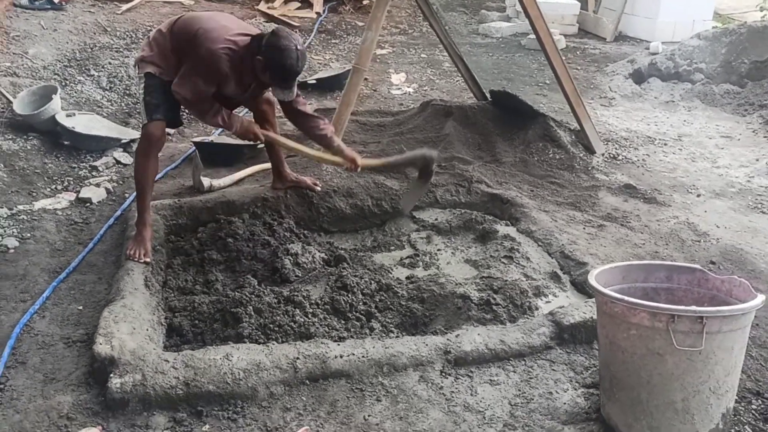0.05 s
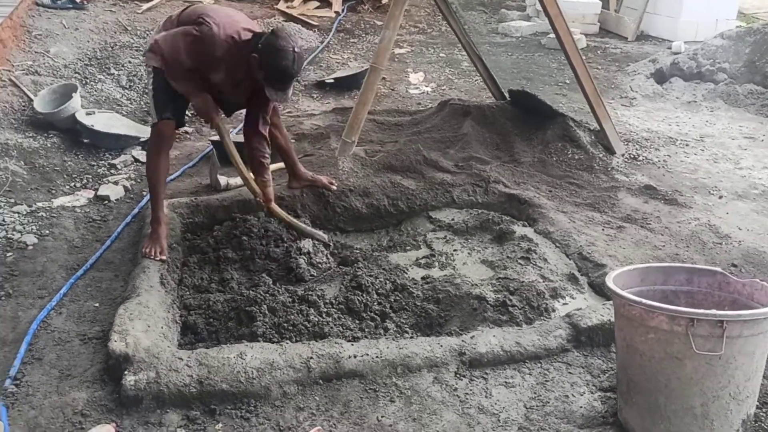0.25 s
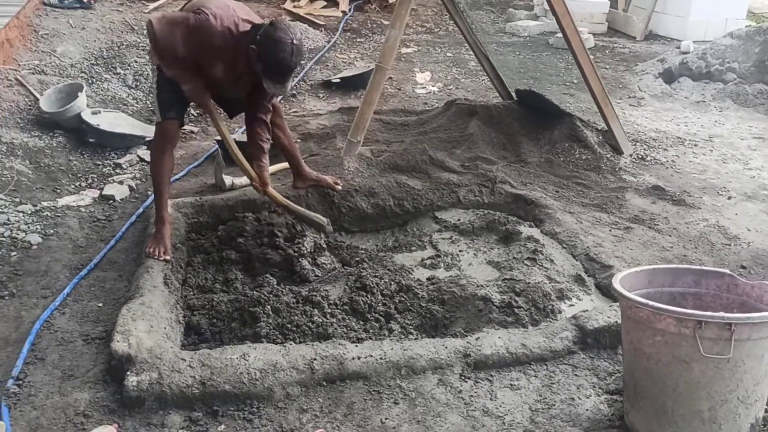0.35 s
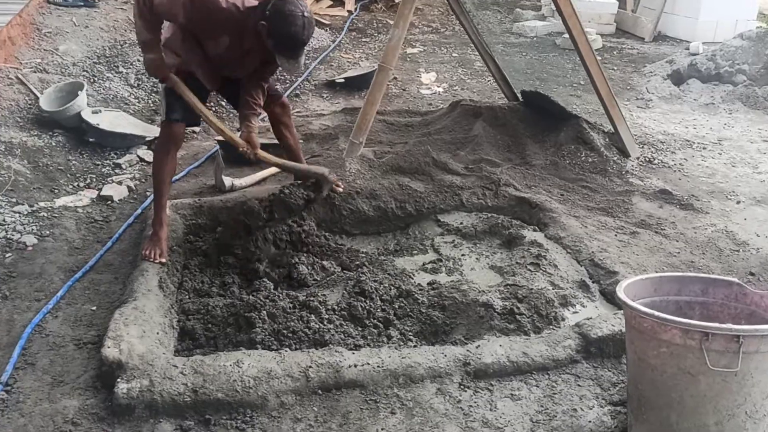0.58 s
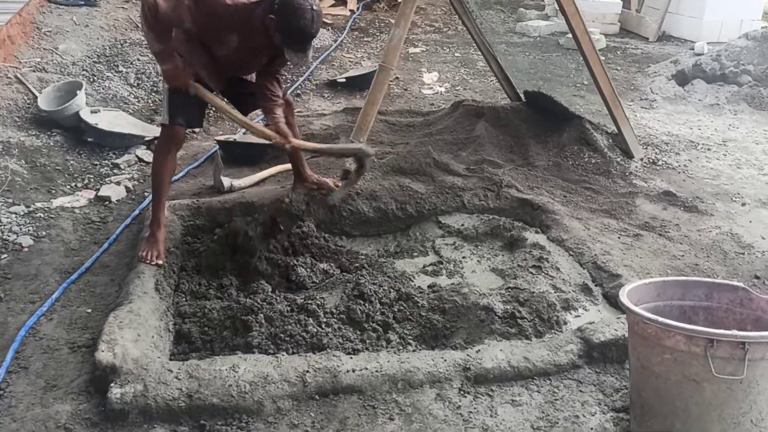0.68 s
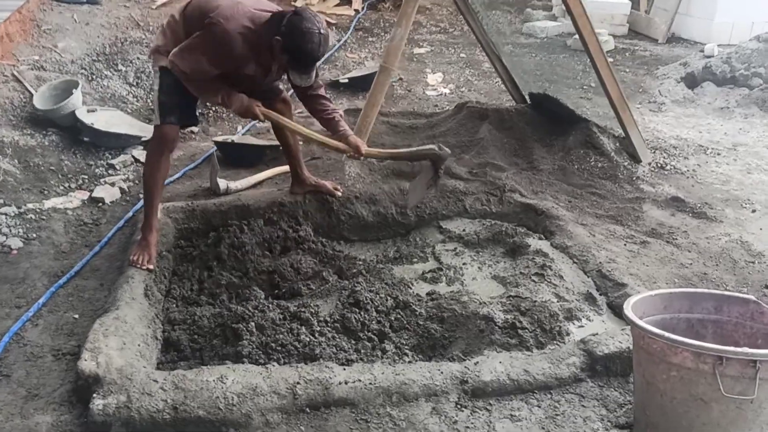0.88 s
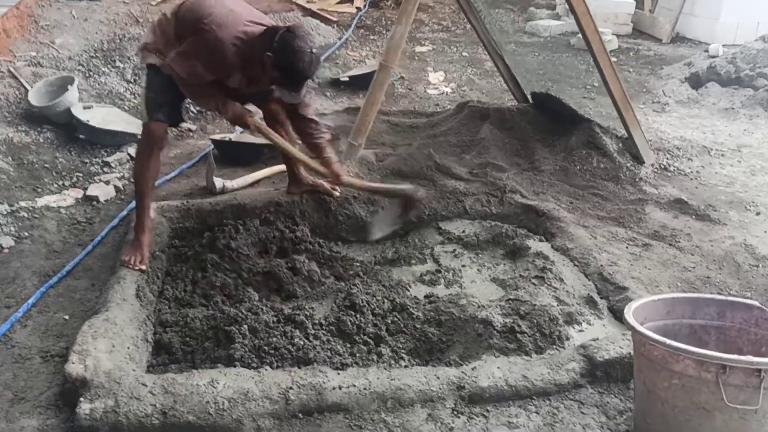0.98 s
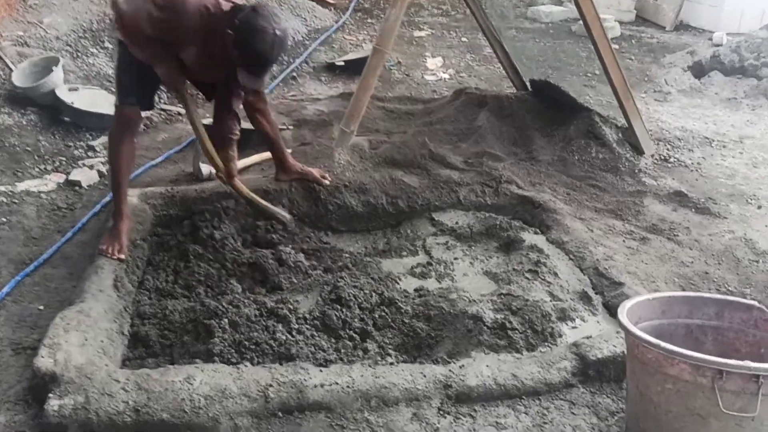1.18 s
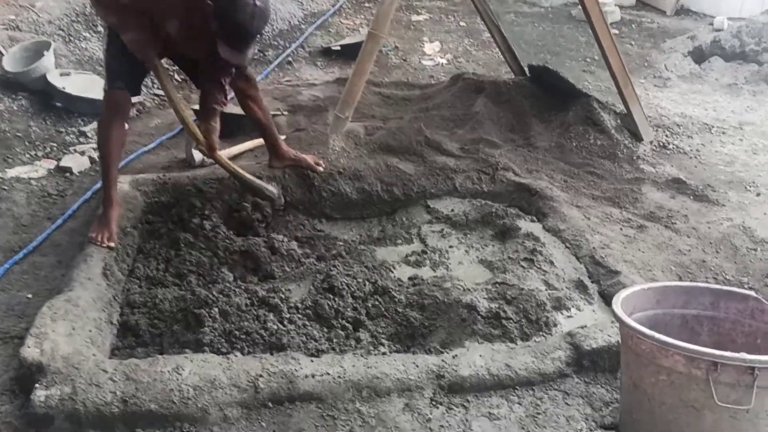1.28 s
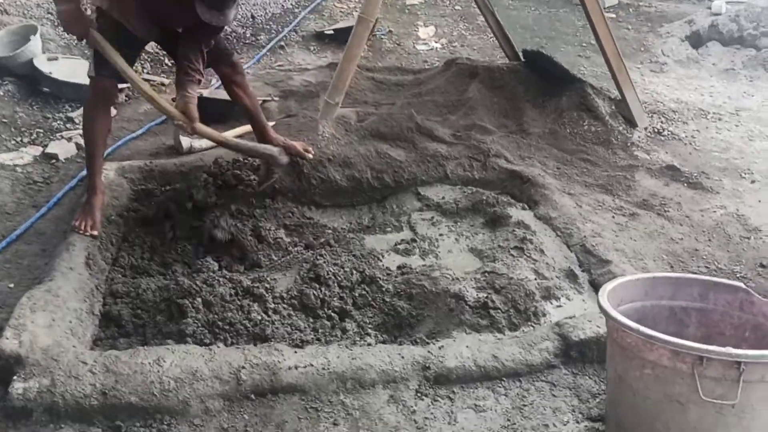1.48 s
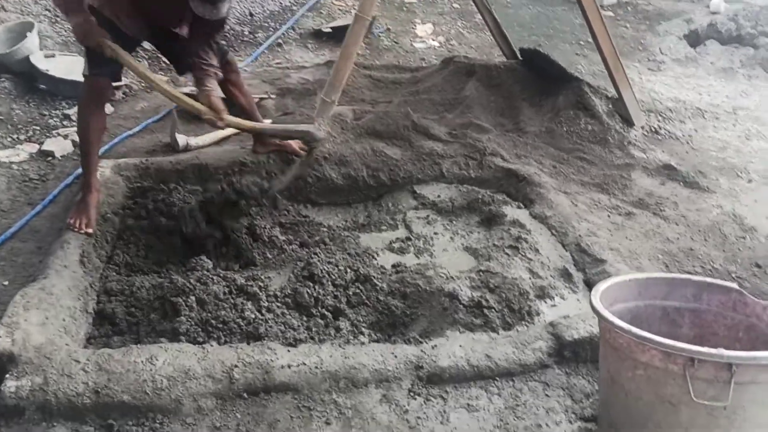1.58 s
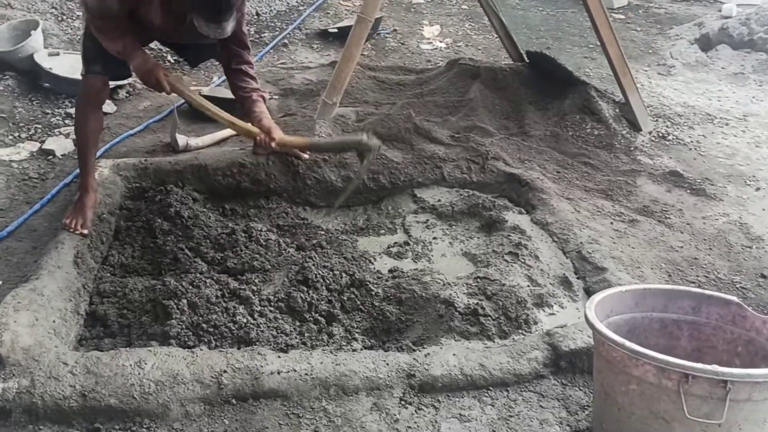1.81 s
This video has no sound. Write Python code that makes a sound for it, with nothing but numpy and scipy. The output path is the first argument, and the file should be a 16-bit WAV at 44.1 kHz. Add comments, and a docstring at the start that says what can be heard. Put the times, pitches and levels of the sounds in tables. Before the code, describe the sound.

Close and dry outdoors on a phone microphone: two crunchy hoe chops about a second apart in gravelly mortar, separated by quiet scraping, dull lump thuds and small stone pings, ending in light pebble ticks.

```python
"""Outdoors, near a phone camera, a struck metal thing is still ringing while a hoe drags in gritty cement mix.
The hoe chops in: random grains crunch through blade resonances, then more dragging, and lumps tumble and thud
as filtered grains and damped tones. A second chop adds a knock on the hard bed, four short modes at once.
Lumps roll on, the drag resumes and pebbles tick more often, each a damped ring with a noise crack.
Stones ping at random throughout, over a murmur of filtered noise. Two microphone ports colour the grit differently.
"""
import sys
import numpy as np
from scipy import signal
from scipy.fft import rfft, irfft, next_fast_len
from scipy.io import wavfile
from scipy.ndimage import uniform_filter1d, map_coordinates

SR = 44100
rng = np.random.default_rng(int(sys.argv[2]) if len(sys.argv) > 2 else 0)


def master(y):
    """Save y as 16-bit WAV."""
    cut = np.clip(np.atleast_2d(y).T, -1, 1)
    pcm = np.round(cut * 32767)  # scale
    wavfile.write(sys.argv[1], SR, pcm.astype(np.int16))


N = 81585  # length in samples

# Blade biting in, one list per chop. Each row: time in seconds, grit hiss level in dB, then in dB over that hiss:
# upper hiss, crunch, low crunch and top sizzle.
CHOP_LEVELS = [[(.205, -60, 2, 1, -9, -17.5), (.2075, -40, -4, -10, -0.5, -25),
               (.2115, -34, 3, -12, -20, -26),
               (.213, -23, -2, -19, -21, -27)] + [(0.218, -25.5, 2, -9.5, -7.5, -20),
               (0.232, -16.5, -11.5, -6.5, -19, -32), (0.25, -28.5, -6, -2.5, -11, -18),
               (0.324, -48.5, -1, -0.5, -4.5, -17.5), (0.36, -47, -6, -6, -16.5, -21)],
               [(1.075, -61.5, 0, -5.5, -9, -18), (1.0775, -46, 0.5, -8, -19, -14),
               (1.0805, -36.5, 1.5, -5, -22, -9), (1.083, -32.5, 0, -9, -22, -9),
               (1.0855, -22, -10, -16, -21.5, -10.5)] + [(1.09, -21.5, -2.5, -9, -19, -10.5),
               (1.104, -19, -8.5, -14.5, -23, -19), (1.128, -30, 0, -1.5, -1.5, -14.5),
               (1.15, -33, -10.5, -4.5, -6, -26), (1.196, -45, -4, -2, -3, -23),
               (1.27, -51, -0.5, -5, -9, -18.5)]]
# Blade dragging and mix trickling. Each row: the same columns and units as for the chops.
DRAG_LEVELS = [
    [(.012, -49.5, -5.5, -3.5, -10, -16.5), (.1, -56.5, -1.5, 2.5, -3.5, -14.5),
     (.132, -58.5, -3, 6.5, 5.5, -13), (.137, -41.5, -2, -5, -8.5, -26), (.146, -53, -5, -4, -10, -19),
     (.152, -52.5, -0.5, -1.5, -4.5, -11.5), (.198, -62, -1.5, 3.5, 4.5, -23)],
    [(0.365, -49.5, -4.5, -3, -5, -23), (0.461, -51, -4, -6, -8.5, -20), (0.503, -54.5, -6, -2.5, -5, -17),
     (0.519, -57, -3.5, 0.5, 2, -14), (0.545, -51.5, -3, -4.5, -6, -19),
     (0.617, -45.5, -5.5, -5.5, -10, -16.5), (0.645, -46, -2.5, -3.5, -8, -14),
     (0.66, -47, -2.5, -14, -8, -14)],
    [(0.672, -49.5, -5, -6, -7.5, -18), (0.718, -59, -1, -0.5, -1, -9), (0.77, -54.5, -1, -1.5, -8, -14.5),
     (0.778, -51, -13, -12, -9, -17.5), (0.83, -49, 1, -6, -13, -15), (0.908, -45.5, -10, -9.5, -14, -20),
     (0.924, -53, -5.5, -9.5, -9, -12), (1.016, -59, -6, -0.5, -10, -18)],
    [(1.021, -47, -4, -13, -22, -16.5), (1.029, -49, -6.5, -16, -14, -16), (1.037, -57, -1, 1, -4, -2),
     (1.049, -64.5, -2, -2, -5, -22), (1.066, -57.5, -5.5, -4, -1, -17.5)],
    [(1.275, -52.5, -1, 0.5, -4, -21.5), (1.311, -46.5, -5, -15, -19, -19.5), (1.315, -50, -5, -5, -5, -13),
     (1.411, -48, -6, -8.5, -16, -15.5), (1.443, -47, -6.5, -5.5, -6, -17),
     (1.549, -41, -0.5, -7, -19.5, -19), (1.583, -44, -5, -12, -26, -17), (1.59, -47, -2, -9, -18.5, -14)],
    [(1.605, -49.5, -1, -12, -10, -14), (1.637, -51, -7.5, -11, -26, -14),
     (1.657, -51, -0.5, -6, -11.5, -12), (1.677, -47, -5, -8, -12.5, -16),
     (1.769, -47, -3.5, -6.5, -22, -13.5), (1.795, -48, -8.5, -9, -29.5, -17.5),
     (1.809, -59.5, 2.5, 0, -14, -5), (1.85, -57, -7, -6, -13, -14.5)],
]
# Bands each chop weakens or lifts, one list per chop. Each row: centre in Hz, width in Hz, gain in dB.
CHOP_BANDS = [
    [(1024, 180, -9), (1364, 450, -4.5), (5440, 670, -6)],
    [(5500, 130, 5)],
]
# Resonances of the steel blade. Each row: pitch in Hz, width in Hz, gain in dB.
BLADE_MODES = [(3120, 16, -9.5), (3887, 63, 3), (4152, 66, -4.5), (6446, 100, 4.5), (6710, 75, -2.5),
               (6790, 96, -12), (8100, 29, -18), (7400, 35, -19), (7010, 65, -9.5), (8500, 65, -6.5)]
# Spectrum of the crunch. Each row: frequency in Hz, gain in dB.
CRUNCH_SPECTRUM = [(620, -43), (1300, -7.5), (1620, -5), (1760, -3), (1930, -4), (2090, -2), (3000, -5),
                   (3900, -20), (6600, -120)]
# Spectrum of the low crunch. Each row: frequency in Hz, gain in dB.
LOW_CRUNCH_SPECTRUM = [(400, -51), (540, -8), (620, -2), (800, -3.5), (920, -8), (1050, -10.5),
                       (1400, -39.5)]
# Lumps rolling. Each row: time in seconds, rumble level in dB.
TUMBLE_LEVELS = [
    [(.01, -53.5), (.2, -63.5), (.242, -51.5), (.32, -55.5), (.484, -60.5), (.487, -52)],
    [(0.491, -39), (0.515, -41.5), (0.527, -43), (0.551, -44), (0.583, -44.5), (0.6, -45.5), (0.8, -53.5),
     (0.881, -54), (0.923, -61), (0.965, -57), (1.07, -58.5)],
    [(1.15, -39), (1.166, -40.5), (1.214, -44), (1.242, -45.5), (1.288, -50), (1.388, -55.5),
     (1.416, -51.5), (1.44, -57), (1.468, -52), (1.594, -61), (1.6, -60.5)],
]
# Resonances of the hollow mix. Each row: pitch in Hz, width in Hz, gain in dB.
LUMP_MODES = [(224, 93, -9), (326, 76, -1.5), (401, 80, -0.5), (499, 118, -4)]
# Lumps and blade landing. Each row: start in seconds, level before attack in dB, pitch in Hz, 60 dB decay in seconds.
THUD_HITS = [(0.241, -35, 199, 0.075), (.488, -26, 477, 0.033), (.488, -29, 226, .025),
             (0.5043, -26.5, 480, 0.038), (.518, -34, 300, 0.025), (0.5385, -30, 386, 0.1),
             (.5635, -32, 522, 0.037), (0.59, -34, 435, 0.055), (1.089, -26, 362, 0.049),
             (1.1197, -11, 278, 0.053), (1.1227, -8.5, 318, 0.034), (1.138, -28.5, 304, 0.071),
             (1.1452, -13, 300, 0.014), (1.159, -32, 330, 0.021), (1.178, -35, 196, 0.051),
             (1.199, -35, 393, 0.012), (1.209, -30, 353, 0.027), (1.255, -36.5, 393, 0.046),
             (1.287, -40.5, 404, 0.13), (1.305, -36, 291, 0.071), (1.355, -42, 390, 0.088),
             (1.408, -41, 338, .06)]
# Modes of the hard bed. Each row: pitch in Hz, level over the knock in dB, 60 dB decay in seconds.
BED_MODES = [(750, -18, 0.019), (878, 10, 0.015), (1050, 6, 0.013), (1490, -24, 0.023)]
# Pebbles. Each row: start in seconds, reference level in dB, pitch in Hz, 60 dB decay in cycles of that pitch.
PEBBLE_TICKS = [(.1365, -36.5, 4180, 7.2), (.168, -37.5, 1000, 4.8), (.3905, -21.5, 1430, 2.4),
                (0.654, -32, 3600, 9.8), (.84, -32.5, 3890, 4.5), (1.172, -20.5, 3600, 13.7),
                (1.305, -33.5, 3500, 22), (1.433, -37.5, 3470, 40), (1.487, -33, 3720, 12),
                (1.527, -31.5, 3350, 9.1), (1.553, -30.5, 3420, 12), (1.576, -34.5, 3710, 12),
                (1.683, -37, 3290, 50), (1.729, -35.5, 3670, 25), (1.755, -43, 1730, 47)]
# Modes of the struck metal. Each row: pitch in Hz, level over the ring setting in dB, 60 dB decay in seconds.
METAL_MODES = [(348, -1, 0.58), (770, -2, 0.37), (2020, -7.5, .5), (2290, -10, 0.49), (2560, -7, 0.3)]
# Spectrum of the far outdoor murmur. Each row: frequency in Hz, gain in dB.
AIR_SPECTRUM = [(18, -45), (30, -25.5), (43, -10.5), (119, 4), (204, -2.5), (418, -15), (949, -10.5),
                (1500, -16), (1950, -47), (3300, -120)]
# Colour of the left microphone port. Each row: frequency in Hz, gain in dB.
LEFT_PORT = [(500, -15), (1000, -15.5), (2000, -16.5), (3000, -19.5), (4200, -13), (5100, -18.5),
             (5900, -30), (6500, -5.5), (7100, -13), (7600, -5.5), (8000, -14.5), (8600, -20.5),
             (11500, -22), (15500, -18)]
# Colour of the right microphone port. Each row: frequency in Hz, gain in dB.
RIGHT_PORT = [(500, -9.5), (1000, -15.5), (2000, -10.5), (3000, -9.5), (3700, 2.5), (4300, -2.5),
              (4700, -4), (5100, -16), (5700, -13.5), (6300, -7), (7500, -6.5), (8000, -14.5), (8600, -16),
              (11500, -20.5), (14000, -18), (15800, -34.5)]
# Phase of the right port behind the left. Each row: frequency in Hz, lag in radians.
PORT_LAG = [(300, -0.5), (2500, 1.23), (4000, -0.5), (5000, 2.5), (5500, 3), (6500, 6.5), (7500, 9.5),
            (8500, 10.5), (11500, 10.5), (16000, 16.5)]
CODEC_GAP = (8550, 11550)

DRAG_TRAIL_S = .00008  # extra lag of the right port for drags, which lie further left
DRAG_BLADE_DB, CHOP_BLADE_DB = 0, 4.5  # blade ring over the bare grit
GRAVEL_PER_S, GRAVEL_T60_S = 170, 0.013
GRAVEL_HZ, GRAVEL_OCTAVES = 3796, 0.3  # middle pitch and its random spread
GRAVEL_DB, GRAVEL_SPREAD_DB = 2, 3.5  # over the hiss, plus a random extra
THUD_CUT_HZ = 94  # small lumps push no deep bass
THUD_TRAIL_S = 0.00015  # lag of the right port behind the left
KNOCK_S, KNOCK_DB = 1.1225, -21.5  # the blade meets the hard bed
CRACK_DB, CRACK_T60_S = -2.5, 0.0037  # bright crack against the tick's reference level
RING_DB, AIR_DB = -42, -56.5
LOW_CUT_HZ, TOP_HZ = 53, 15750  # bass corner and upper limit of the finished sound


def amp(db):
    """Turn dB into an amplitude factor."""
    return 10 ** (np.asarray(db) / 20)


def unit(x):
    """Scale so that the average of the two ports has an RMS of one."""
    return x / np.sqrt(np.mean(x.mean(0) ** 2) + 1e-20)


def along(points, hz):
    """Read a curve of (Hz, value) points on a log frequency axis."""
    point_hz, value = np.transpose(points)
    return np.interp(np.log(hz + 1), np.log(point_hz + 1), value)


def curves(tables):
    """Join the tables in time and draw each column as one value per sample."""
    s, *columns = np.transpose(sorted(row for table in tables for row in table))
    return [np.interp(np.arange(N) / SR, s, column) for column in columns]


def wobble(rate):
    """A smooth random curve with rate knots a second."""
    knots = rng.standard_normal(int(N * rate / SR) + 4)
    return map_coordinates(knots, [np.arange(N) * rate / SR])


def filtered(x, response):
    """Shape x by a complex response of frequency."""
    m = next_fast_len(N + SR // 2)
    hz = np.fft.rfftfreq(m, 1 / SR)
    return irfft(rfft(x, m) * response(hz), m)[..., :N]


def low_cut(hz, corner_hz):
    """A second-order high-pass response."""
    return (1j * hz / (corner_hz + 1j * hz)) ** 2


def band(hz, lo_hz, hi_hz, order):
    """A soft band-pass gain."""
    return 1 / np.sqrt((1 + (lo_hz / (hz + 1)) ** order) * (1 + (hz / hi_hz) ** order))


def resonances(hz, peaks):
    """Sum resonant peaks with alternating sign."""
    total = 0
    for k, (c, w, db) in enumerate(peaks):
        total = total + (-1) ** k * amp(db) * 1j * hz * w / (c * c - hz * hz + 1j * hz * w)
    return total


def ports(hz, trail_s):
    """Colour of each port; the right one has its own phase lag and a delay."""
    late = np.exp(-1j * (along(PORT_LAG, hz) + 2 * np.pi * hz * trail_s))
    return np.array([amp(along(LEFT_PORT, hz)), amp(along(RIGHT_PORT, hz)) * late])


def grains(per_s, spread_db, clump_db, clump_rate, alike):
    """Tiny contacts of random size in clumps; a share of their power reaches both ports alike."""
    hit = rng.random((3, N)) < per_s / SR
    x = hit * rng.standard_normal((3, N)) * amp(spread_db * rng.exponential(size=(3, N)))
    both = np.sqrt(alike) * x[0] + np.sqrt(1 - alike) * x[1:]
    return amp(clump_db * wobble(clump_rate)) * both


def patchy(x, depth_db):
    """Random gain patches in time and pitch: clusters of like-sized stones."""
    z = signal.stft(x, nperseg=256)[2]
    field = rng.standard_normal(z.shape[1:])
    field = uniform_filter1d(field, size=3, axis=0)  # neighbouring pitches
    field = uniform_filter1d(field, size=4, axis=1)  # neighbouring moments
    return signal.istft(z * amp(depth_db * field / field.std()), nperseg=256)[1][:, :N]


def ring(hz, db, t60, attack, length_s=.5):
    """One damped mode: a sine that swells briefly and decays exponentially."""
    t = np.arange(int(SR * length_s)) / SR
    return amp(db - 60 * t / t60) * np.sin(2 * np.pi * hz * t) * (1 - np.exp(-t / attack))


def add(x, s, wave):
    """Mix a short wave in at time s."""
    part = x[round(s * SR):][:len(wave)]
    part += wave[:len(part)]


def grit():
    """Sand and gravel on steel; chops and drags come from slightly different places."""
    t = np.arange(N) / SR
    x = grit_from(DRAG_TRAIL_S, DRAG_BLADE_DB, [])
    for chop, bands in zip(CHOP_LEVELS, CHOP_BANDS):
        biting = (t > chop[0][0]) & (t < chop[-1][0])
        x = np.where(biting, grit_from(0, CHOP_BLADE_DB, bands), x)
    return x


def grit_from(trail_s, ring_db, bands):
    """One place's grains: fine ones excite the blade as hiss and sizzle, coarse ones crunch."""
    hiss_db, upper_db, crunch_db, low_db, sizzle_db = curves(CHOP_LEVELS + DRAG_LEVELS)
    fine = patchy(grains(16000, 1.1, 0.73, 160, 0.24), 1.42)
    coarse = patchy(grains(9000, 1, 0.79, 90, 0.37), 0.54)

    def heard(hz):
        shape_db = sum(db * np.exp(-((hz - c) / w * 2) ** 4) for c, w, db in bands)
        return ports(hz, trail_s) * amp(shape_db)

    def steel(lo_hz, hi_hz):
        return unit(filtered(fine, lambda hz: heard(hz) * blade(hz, ring_db) * band(hz, lo_hz, hi_hz, order=14)))

    def crunching(spectrum):
        # dividing by the right port's gain keeps only the contrast between ports
        return unit(filtered(coarse, lambda hz: heard(hz) / amp(along(RIGHT_PORT, hz)) * amp(along(spectrum, hz))))

    layers = steel(2590, 5510)
    layers = layers + amp(upper_db) * steel(5570, 10560)
    layers = layers + amp(sizzle_db) * steel(10500, 17000)
    layers = layers + amp(crunch_db) * crunching(CRUNCH_SPECTRUM)
    layers = layers + amp(low_db) * crunching(LOW_CRUNCH_SPECTRUM)
    return amp(hiss_db) * layers


def blade(hz, ring_db):
    """Bare grit plus the ring of the blade's modes."""
    return 1 + amp(ring_db) * resonances(hz, BLADE_MODES)


def gravel():
    """Small stones ping at random moments and pitches, their level following the grit hiss."""
    x, hiss_db = np.zeros(N), curves(CHOP_LEVELS + DRAG_LEVELS)[0]
    count = int(GRAVEL_PER_S * N / SR)
    places, sizes, tones = rng.random(count), rng.exponential(size=count), rng.standard_normal(count)
    for place, size, tone in zip(places, sizes, tones):
        db = hiss_db[int(place * N)] + GRAVEL_DB + GRAVEL_SPREAD_DB * size
        hz = GRAVEL_HZ * 2 ** (GRAVEL_OCTAVES * tone)
        add(x, place * N / SR, ring(hz, db, GRAVEL_T60_S, .0002, length_s=.03))
    return filtered(x, lambda hz: ports(hz, DRAG_TRAIL_S))


def tumble():
    """Lumps of mix roll and drop: many contacts through dull, hollow resonances."""
    level_db, = curves(TUMBLE_LEVELS)
    contacts = grains(2500, 2.04, 1.5, 45.3, 0.76)
    rumble = filtered(contacts, lambda hz: resonances(hz, LUMP_MODES) * band(hz, 120, 655, order=8))
    return amp(level_db) * unit(rumble)


def blows():
    """Thuds of lumps and blade as single damped modes, and the knock on the hard bed as several."""
    x = np.zeros(N)
    for s, db, hz, t60 in THUD_HITS:
        add(x, s, ring(hz, db, t60, 0.00097))
    add(x, KNOCK_S, sum(ring(hz, KNOCK_DB + db, t60, 0.00016) for hz, db, t60 in BED_MODES))

    def placed(hz):
        late = np.exp(-2j * np.pi * hz * [[0], [THUD_TRAIL_S]])
        return low_cut(hz, THUD_CUT_HZ) * amp([[-.4], [.4]]) * late
    return filtered(x, placed)


def pebbles():
    """Single stones tick on the blade: a damped ring and a bright crack of decaying noise."""
    rings, cracks, t = np.zeros(N), np.zeros(N), np.arange(SR // 100) / SR
    for s, db, hz, cycles in PEBBLE_TICKS:
        add(rings, s, ring(hz, db + 6, cycles / hz, .0001))
        add(cracks, s, amp(db + CRACK_DB - 60 * t / CRACK_T60_S) * rng.standard_normal(len(t)))
    rings = filtered(rings, lambda hz: amp([[-3.5], [2.5]]) * low_cut(hz, 450))
    cracks = filtered(cracks, lambda hz: ports(hz, DRAG_TRAIL_S) * band(hz, 2800, 20000, order=4))
    return rings + cracks


def metal():
    """The fading ring of something struck just before, a sum of damped modes."""
    x = np.zeros(N)
    add(x, 0, sum(ring(hz, RING_DB + db, t60, 0.0023) for hz, db, t60 in METAL_MODES))
    return x * amp([[-1.2], [1.2]])  # leans right


def air():
    """Far outdoor murmur: gently wavering low noise, largely shared by both ports."""
    noise = rng.standard_normal((3, N))
    both = noise[0] + 0.71 * noise[1:]
    murmur = filtered(both, lambda hz: amp(along(AIR_SPECTRUM, hz)))
    return amp(AIR_DB + 1.0 * wobble(3.7)) * unit(murmur)


def scene():
    """Mix the hoe's work, the ringing metal and the open air."""
    return grit() + gravel() + tumble() + blows() + pebbles() + metal() + air()


def record(dry):
    """The camera cuts the deep bass; audio compression empties a treble band, and the sound ends at its top limit."""
    def response(hz):
        kept = ((hz < CODEC_GAP[0]) | (hz > CODEC_GAP[1])) & (hz < TOP_HZ)
        return kept * low_cut(hz, LOW_CUT_HZ)
    return filtered(dry, response)


dry = scene()
out = record(dry)
master(out)
```